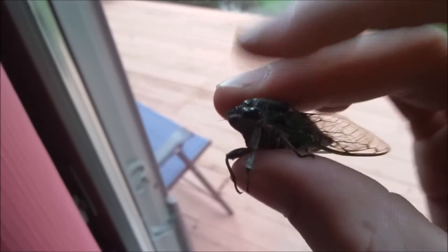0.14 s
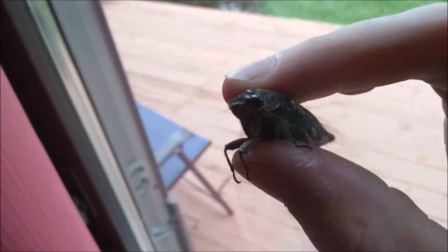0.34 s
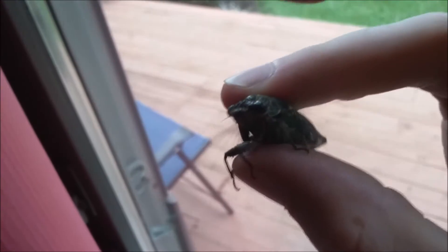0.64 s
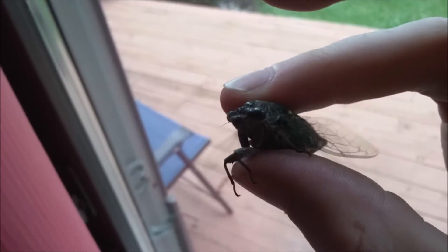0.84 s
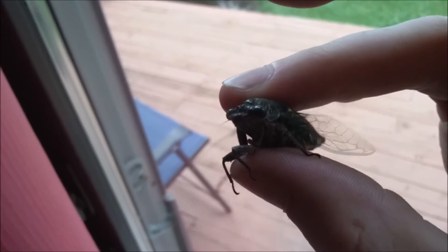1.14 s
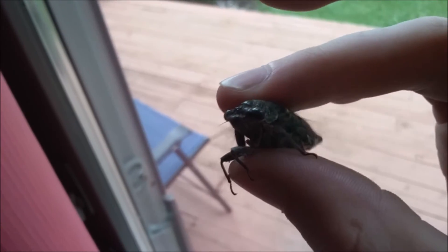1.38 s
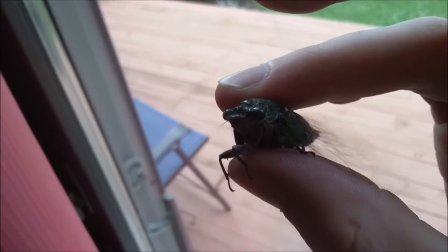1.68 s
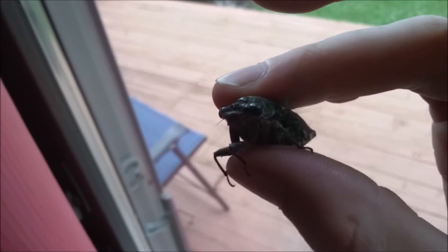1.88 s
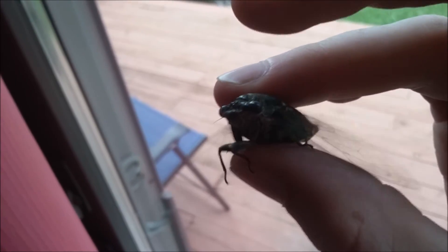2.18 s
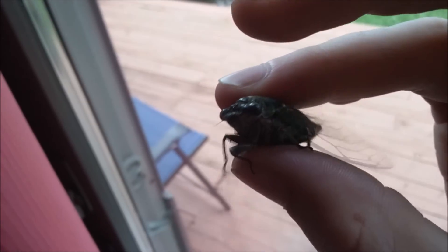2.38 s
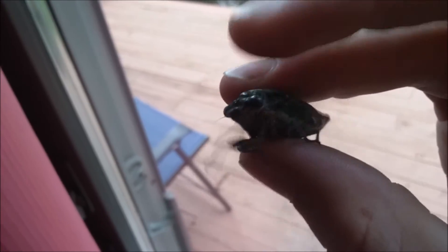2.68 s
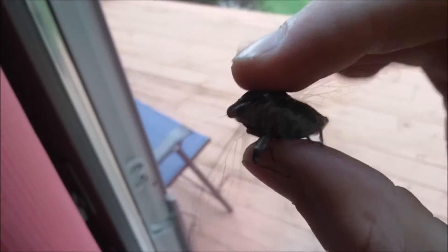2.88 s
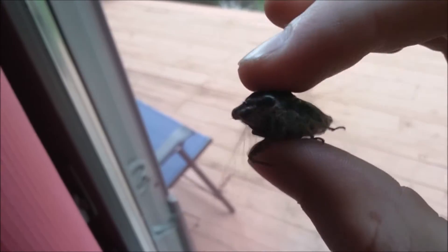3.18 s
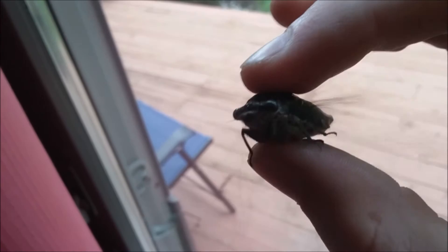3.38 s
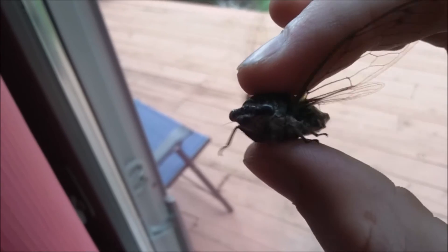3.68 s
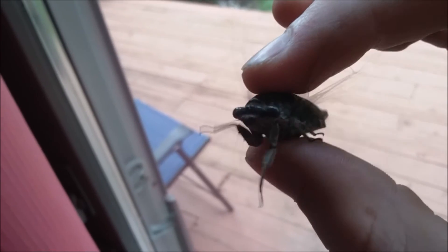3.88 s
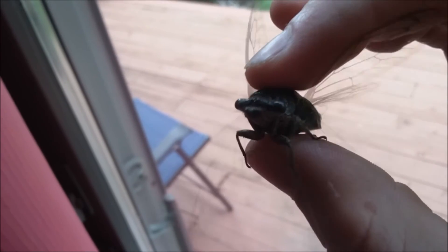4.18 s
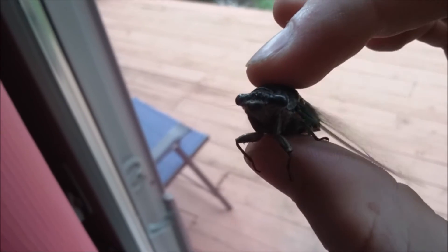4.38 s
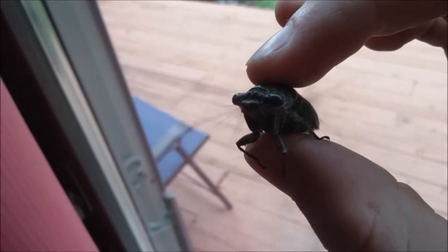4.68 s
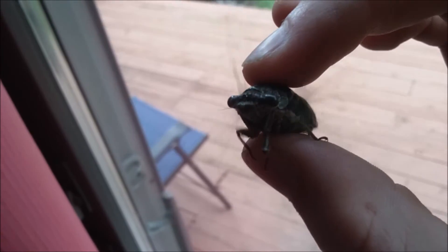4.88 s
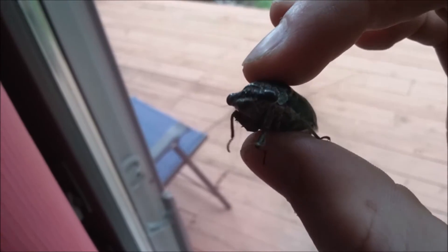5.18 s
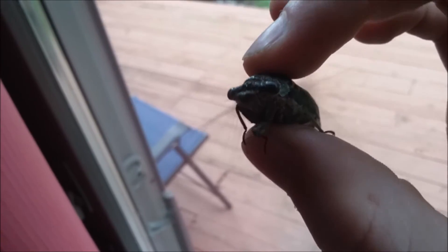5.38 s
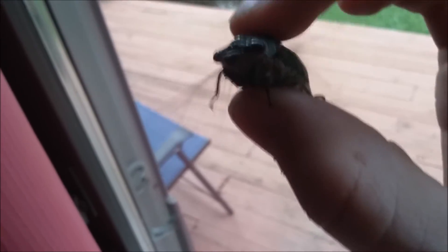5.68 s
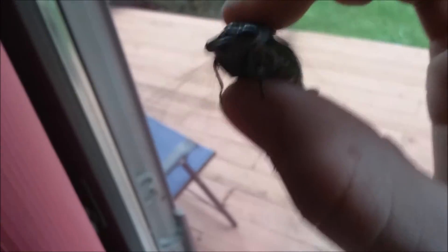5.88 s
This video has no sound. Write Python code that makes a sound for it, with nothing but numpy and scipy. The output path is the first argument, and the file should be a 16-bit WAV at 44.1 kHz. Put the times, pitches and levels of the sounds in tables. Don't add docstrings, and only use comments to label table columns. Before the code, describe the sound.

Very close to the microphone, a cicada pinched in the fingers beats its stiff wings. Near silence, then faint dry flickers and soft brushes against skin, growing into sharp irregular clicks. After the grip shifts, the slaps come steadily harder and finally run together into a fast rattling flutter. Small low puffs of air and fine hiss follow the strokes, with a barely audible motor hum behind.

```python
import sys
import numpy as np
from scipy import signal
from scipy.fft import rfft, irfft, dct
from scipy.io import wavfile
from scipy.ndimage import uniform_filter1d

SR = 44100
rng = np.random.default_rng(int(sys.argv[2]) if len(sys.argv) > 2 else 0)


def generate_wav(sig):
    pcm = np.round(np.clip(np.atleast_2d(sig).T, -1, 1) * 32767).astype(np.int16)
    wavfile.write(sys.argv[1], SR, pcm)


def amplitude_ratio(level_db):
    exponent = np.asarray(level_db, float) / 20
    return 10 ** exponent


N = 266364
BURST_S, LEAD_S = 0.035, 0.01

# centre in Hz, width in Hz, level in dB.
MEMBRANE_MODES = [(11120, 2940, -5), (11750, 1530, 0), (13600, 1920, -2), (15340, 1110, -3.5),
                  (15650, 400, -6.5)]
# centre in Hz, width in Hz, level in dB.
BODY_MODES = [(879, 374, 0), (2087, 316, 1.5), (2550, 496, 2), (3790, 890, 3), (5360, 1060, -2),
              (6620, 2120, -2.5)]


def beats():
    # first slap in seconds, last slap in seconds, beats, slap in dB, drag in dB.
    even_runs = [(0.353, .382, 2, -38, -37), (0.4844, 0.514, 2, -44, -39.5),
                 (0.542, 0.7264, 7, -34.5, -34.5), (0.816, .848, 2, -31.5, -31.5),
                 (1.045, 1.074, 2, -59, -38), (1.368, 1.4007, 2, -28, -34.5), (1.432, 1.528, 4, -37, -35.5),
                 (1.647, 1.7106, 3, -24.5, -37), (2.007, 2.036, 2, -34, -34.5),
                 (2.1568, 2.2212, 3, -18, -33), (2.275, 2.3085, 2, -39, -34.5),
                 (2.4169, 2.459, 2, -15.5, -39), (4.753, 4.8155, 3, -18.5, -28),
                 (4.8514, 4.9108, 3, -19.5, -30.5), (4.941, 4.969, 2, -17.5, -30.5),
                 (5.0, 5.0262, 2, -16.5, -29.5), (5.1357, 5.2422, 5, -15.5, -28),
                 (5.2693, 5.4315, 7, -14, -29), (5.4595, 5.4843, 2, -14, -43),
                 (5.5119, 5.5395, 2, -16, -25), (5.57, 5.5983, 2, -17.5, -25.5),
                 (5.6827, 5.7115, 2, -16.5, -27.5), (5.737, 5.8175, 4, -13, -26),
                 (5.843, 5.9753, 6, -13.5, -28.5)]
    # slap in seconds, slap in dB, drag ahead of it in ms, drag in dB.
    single_beats = [(.315, -25, 11, -58), (0.403, -36, 15, -43), (0.4392, -20.5, 15, -38),
                    (0.738, -22.5, 6, -60), (0.874, -38, 8.3, -53), (.786, -39, 15, -33.5),
                    (0.93, -38, 19, -40), (1.123, -53, 12, -32.5), (1.19, -47, 22, -32),
                    (1.218, -54.5, 12, -34.5), (1.2845, -31, 23.4, -29), (1.328, -34, 23.3, -35),
                    (1.5585, -29.5, 6.3, -61), (1.6, -35, 15, -42), (1.7552, -20, 18, -29.5),
                    (1.8237, -14, 21, -37.5), (1.876, -19.5, 28, -33), (1.9332, -25, 33, -26.5),
                    (1.9692, -37, 12.6, -31.5), (2.0628, -19, 4.8, -59), (2.088, -24.5, 14, -29.5),
                    (2.129, -43, 15.7, -26), (2.3325, -13.5, 7.6, -56), (2.511, -13, 28, -33.5),
                    (2.5553, -19.5, 21, -33.5), (2.581, -12.5, 13, -27.5), (2.6326, -14, 23, -28.5),
                    (2.6765, -22.5, 16.4, -24), (2.737, -16, 16, -26.5), (2.785, -18, 16, -28.5),
                    (2.8802, -26.5, 38, -39), (2.9374, -22.5, 21, -32), (2.998, -14, 26, -35.5),
                   (3.0339, -16.5, 13, -35), (3.0777, -15.5, 15.3, -31), (3.1426, -17.5, 20, -37),
                   (3.2095, -16, 18.3, -30), (3.382, -17, 29, -27.5), (3.4571, -20.5, 25.4, -28),
                   (3.511, -14.5, 9.9, -38), (3.5834, -18, 29, -29.5), (3.6455, -19.5, 17, -26.5),
                   (3.687, -22.5, 16, -41), (3.7549, -20.5, 30.5, -24), (3.832, -19.5, 27, -29),
                   (3.865, -22.5, 17.6, -31.5), (3.947, -25, 33, -22), (3.9729, -19, 10.3, -28.5),
                   (4.0231, -19.5, 13.5, -25.5), (4.0478, -15.5, 8.8, -31), (4.082, -14, 10, -30.5),
                   (4.13, -18, 27, -36), (4.2006, -13.5, 20, -26), (4.2284, -20.5, 11.2, -20.5),
                   (4.249, -20.5, 7.3, -59), (4.3198, -22, 26, -32), (3.2779, -17.5, 20, -26.5),
                   (3.312, -17, 12, -41),
                    (4.3471, -19.5, 11.2, -24), (4.3833, -22, 10.4, -33), (4.417, -15, 12, -38),
                 (4.588, -20.5, 10.5, -30.5), (4.6224, -19, 11.4, -31.5), (4.6548, -18.5, 13, -52),
                 (4.464, -38.5, 16, -37), (4.5016, -22, 11, -57), (4.5556, -31, 17, -32),
                 (4.7095, -16, 26, -35), (5.0603, -29, 14.3, -27.5), (5.0861, -22, 13.1, -21.5),
                 (5.111, -19, 9.4, -34), (5.6284, -12.5, 9, -30), (5.6558, -19, 12.5, -21.5),
                 (6.0016, -13.5, 9, -26), (6.0283, -14, 9.9, -26)]
    regrip_s = 2.82
    recover_s, ahead_share = 0.0175, 0.35
    wobble_s, wobble_db = 0.0004, 1.34

    rows = []
    for first, last, count, slap_db, drag_db in even_runs:
        times = np.linspace(first, last, round(count))
        period = times[1] - times[0]
        ahead = period - recover_s if first < regrip_s else ahead_share * period
        luck = rng.standard_normal((len(times), 3))
        luck[[0, -1], 0] = 0
        for at, (late, slap_luck, drag_luck) in zip(times, luck):
            rows.append((at + wobble_s * late, slap_db + wobble_db * slap_luck,
                         ahead, drag_db + wobble_db * drag_luck))
    for at, slap_db, ahead_ms, drag_db in single_beats:
        rows.append((at, slap_db, ahead_ms / 1000, drag_db))
    return np.transpose(rows)


def strokes():
    # time in seconds, level in dB.
    finger_press = [
        (0, -2.5),
        (1.5, 4.5),
        (2.4, 1.5),
        (3.0, -2.5),
        (4.0, -0.5),
        (4.45, 4.5),
        (4.95, -1),
        (5.9, -2.5),
        (6.04, 5),
    ]
    snap_db, snap_range_db = -30, 2.5
    brush_ms, drag_spread, longest_ms = 1.37, 0.16, 2.8

    s, slap_db, ahead, drag_db = beats()
    hard = 1 / (1.5 + np.exp((snap_db - slap_db) / snap_range_db))
    luck = 1.21 * rng.standard_normal((len(s), 2))
    body_db = -13 - 0.14 * (slap_db + 21) + np.interp(s, *np.transpose(finger_press)) + luck[:, 0]
    crack = s, slap_db + 10 * np.log10(hard), body_db
    brush = s, slap_db + 20 * np.log10(1 - hard + 1e-4), body_db, np.full(len(s), brush_ms)
    drag_ms = np.minimum(drag_spread * ahead * 1000, longest_ms)
    drag = s - ahead, drag_db, -5 + luck[:, 1], drag_ms
    return crack, np.concatenate([brush, drag], axis=1)


def slaps(s, membrane_db, body_db):
    t = np.tile(np.arange(round(BURST_S * SR)) / SR - LEAD_S + 0.0002, (len(s), 1))
    crack = 3.2 * (np.abs(t) < 0.5 / SR)
    creak = amplitude_ratio(-45) * np.exp(np.minimum(t, 0) / 0.0001) * (t < 0)
    rattle = (t > 0) * amplitude_ratio(-21.0 - 60 * t / 0.01)
    rise = np.exp(np.minimum(t, 0) / 0.0004)
    knock = rise * amplitude_ratio(-14.5 - 60 * np.maximum(t, 0) / 0.026)
    push = -np.sin(2 * np.pi * 280 * t) * np.exp(-((t - 0.0015) / 0.0017) ** 2)

    membrane = thin(bursts(MEMBRANE_MODES, creak + rattle, grain_db=6.5, colour_db=5.5, crack=crack))
    body = bursts(BODY_MODES, knock, grain_db=2.0, colour_db=0.5, crack=crack)
    return (place(membrane, s, membrane_db)
            + place(body, s, membrane_db + body_db)
            + place(push, s, 0.64 * membrane_db - 39.5))


def rustles(s, membrane_db, body_db, spread_ms):
    t = np.arange(round(BURST_S * SR)) / SR - LEAD_S + 0.00032
    spread = np.clip(spread_ms, 0.3, 4)[:, None] / 1000
    swell = np.where(t < 0, np.exp(-(t / (1.01 * spread)) ** 2), np.exp(-t / (1.57 * spread)))
    flick = 3.8 * np.exp(-(spread / 0.0016) ** 4) * (np.abs(t) < 0.5 / SR)

    membrane = thin(bursts(MEMBRANE_MODES, swell, grain_db=9.0, colour_db=-0.5, crack=flick))
    body = bursts(BODY_MODES, swell, grain_db=1.0, colour_db=3.74, crack=flick)
    return place(membrane, s, membrane_db) + place(body, s, membrane_db + body_db)


def bursts(modes, shape, grain_db, colour_db, crack=0):
    crackle = rng.standard_normal(shape.shape) * amplitude_ratio(grain_db * rng.standard_normal(shape.shape))
    strength = colour_db * rng.standard_normal((len(shape), len(modes)))
    blow = crack + shape * crackle
    rung = 0
    for k, (hz, width_hz, db) in enumerate(modes):
        rung = rung + (-1) ** k * amplitude_ratio(db + strength[:, [k]]) * resonate(blow, hz, width_hz)
    return rung / np.sqrt(np.sum(rung ** 2, axis=1, keepdims=True) * 1000 / SR)


def resonate(x, hz, width_hz):
    r = np.exp(-np.pi * width_hz / SR)
    feedback = [1, -2 * r * np.cos(2 * np.pi * hz / SR), r * r]
    return signal.lfilter([(1 - r * r) / 2, 0, (r * r - 1) / 2], feedback, x)


def thin(rows):
    return signal.sosfilt(signal.butter(4, 9200, "high", fs=SR, output="sos"), rows)


def place(rows, at_s, db):
    out = np.zeros(N + rows.shape[1])
    at = np.round((at_s - LEAD_S) * SR).astype(int)[:, None] + np.arange(rows.shape[1])
    np.add.at(out, at, rows * amplitude_ratio(db)[:, None])
    return out[:N]


def air(puff_db, hiss_db, beat):
    # frequency in Hz, density in dB per Hz.
    puff_spectrum = [(15, -59), (25, -101), (59, -4), (124, 3.5), (201, -2), (237, 2.5), (286, -6),
                     (355, -5), (520, -15.5), (680, -22), (1140, -120)]
    # frequency in Hz, density in dB per Hz.
    hiss_spectrum = [(260, -16), (450, -7.5), (1120, -17.5), (4680, -20), (9580, -20), (10300, -17),
                     (11600, -18.5), (13900, -12.5), (15900, -11)]
    puffs = coloured(puff_spectrum) * amplitude_ratio(0.88 * drift(21) + 0.26 * bustle(beat, hold_s=0.0016))
    hiss = coloured(hiss_spectrum) * amplitude_ratio(2.2 * drift(41) + 0.36 * bustle(beat, hold_s=0.005))
    return amplitude_ratio(puff_db + 1.0) * rms_one(puffs) + amplitude_ratio(hiss_db - 4.5) * rms_one(hiss)


def bustle(beat, hold_s):
    r = np.exp(-1 / (hold_s * SR))
    level_db = 10 * np.log10(signal.lfilter([1 - r], [1, -r], beat ** 2) + 1e-7)
    return level_db - uniform_filter1d(level_db, SR // 3)


def hum(hum_db, whine_db):
    # frequency in Hz, level in dB.
    motor_lines = [(173, -1.5), (231, -4), (357, -0.5)]
    motors = sum(amplitude_ratio(db) * waver(hz) for hz, db in motor_lines)
    return amplitude_ratio(hum_db + 3.0) * motors + amplitude_ratio(whine_db + 1.5) * waver(408.6)


def waver(hz):
    strength = amplitude_ratio(1.75 * drift(7.7))
    return strength * np.sin(2 * np.pi * np.cumsum(hz + 1.566 * drift(3.02)) / SR)


def coloured(spectrum):
    hz, db = np.transpose(spectrum)
    bin_hz = np.maximum(np.arange(N // 2 + 1) * SR / N, 1)
    gain = amplitude_ratio(np.interp(np.log(bin_hz), np.log(hz), db))
    return rms_one(irfft(rfft(rng.standard_normal(N)) * gain, N))


def drift(rate_hz):
    r = np.exp(-2 * np.pi * rate_hz / SR)
    wander = signal.lfilter([1], [1, -2 * r, r * r], rng.standard_normal(N + SR))
    return rms_one(wander[SR:])


def rms_one(x):
    return x / np.sqrt(np.mean(x ** 2) + 1e-20)


def scene():
    # time in seconds, level in dB.
    draught = [(0, -66.5), (.3, -62.5), (.34, -56), (.54, -48), (.86, -47.5), (.97, -60), (1.11, -48),
               (1.6, -50.5), (2.17, -47), (2.39, -54), (2.52, -47), (2.84, -54), (3.4, -55), (4.38, -49),
               (4.49, -55), (4.56, -49), (5.3, -46), (6.04, -46)]
    t = np.arange(N) / SR
    puff_db = np.interp(t, *np.transpose(draught))
    swing_db = puff_db + 50
    hiss_db = -47 + 0.96 * swing_db + 0.64 * t
    gate_db = 1.05 * swing_db
    hum_db = -59.5 + gate_db
    whine_db = -65 + gate_db + 9.5 * np.exp(-((t - 1.57) / 0.57) ** 2)

    cracks, sweeps = strokes()
    hard = slaps(*cracks)
    soft = rustles(*sweeps)
    soft = soft + air(puff_db, hiss_db, hard + soft) + hum(hum_db, whine_db)
    below_top = signal.cheby2(12, 40, 16300, fs=SR, output="sos")
    return (hard + signal.sosfilt(below_top, soft))[None]


def starve(x, size, count, lift_db):
    lapses = [0.167, 0.349, 0.444, .632, 1.421, 1.909, 2.051, 2.125, 2.505, 2.831, 3.913, 4.194, 5.175,
              5.814]
    out = x.copy()
    fade = np.sqrt(signal.windows.tukey(size, 0.95))
    for s in lapses:
        middle = round(s * SR)
        part = slice(middle - size // 2, middle + size // 2)
        lines = dct(x[part] * fade, type=4, norm="ortho")
        bands = np.abs(lines).reshape(count, -1)
        heard = rng.random((count, 1)) < 0.4
        strong = heard * (bands >= 0.85 * bands.max(axis=1, keepdims=True))
        gain = np.where(strong, amplitude_ratio(lift_db), amplitude_ratio(-15)).ravel()
        gain[:size // 40] = 1
        out[part] = x[part] * (1 - fade ** 2) + fade * dct(lines * gain, type=4, norm="ortho")
    return out


def band_limit(x):
    return signal.sosfilt(signal.butter(12, 16980, fs=SR, output="sos"), x)


def record(dry):
    lapsed = starve(dry[0], size=1800, count=24, lift_db=3)[None]
    mix = signal.sosfilt(signal.cheby2(14, 50, 16950, fs=SR, output="sos"), lapsed)
    return band_limit(mix)


dry = scene()
out = record(dry)
generate_wav(out)
```